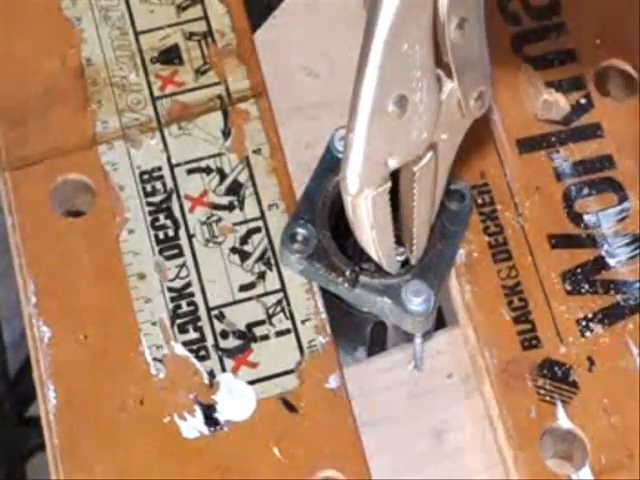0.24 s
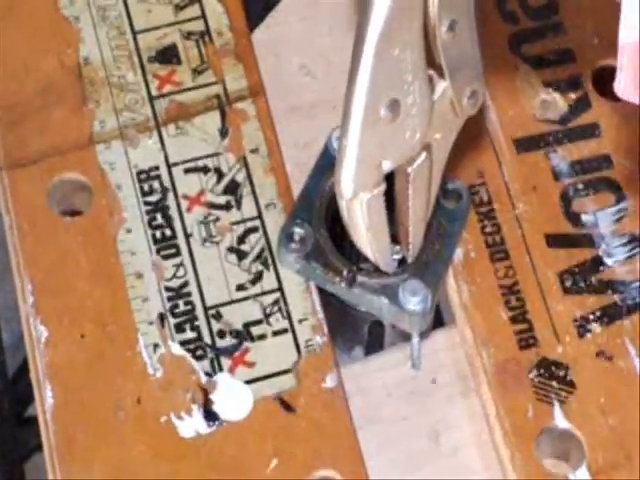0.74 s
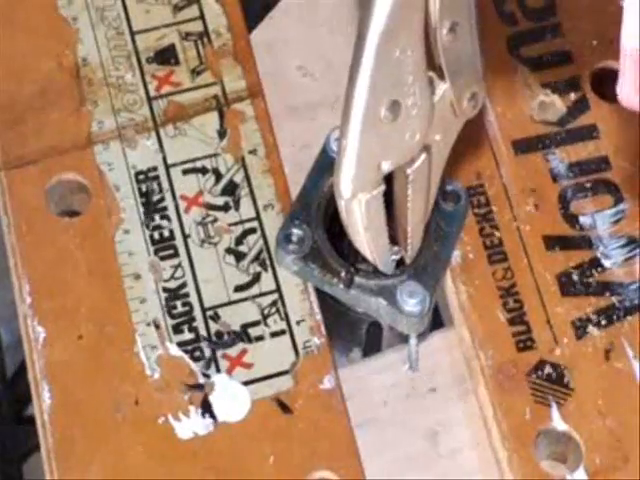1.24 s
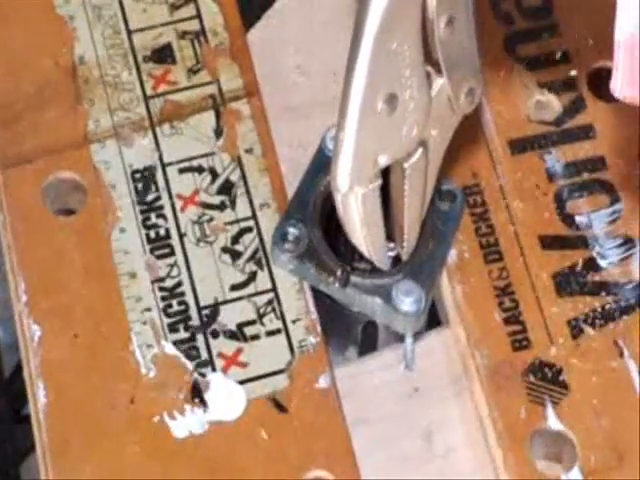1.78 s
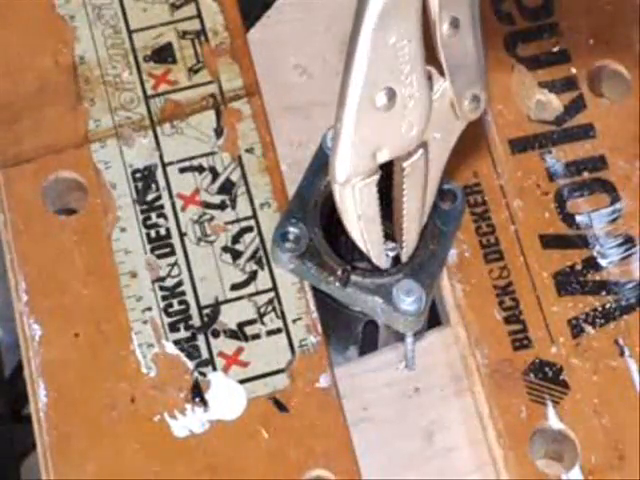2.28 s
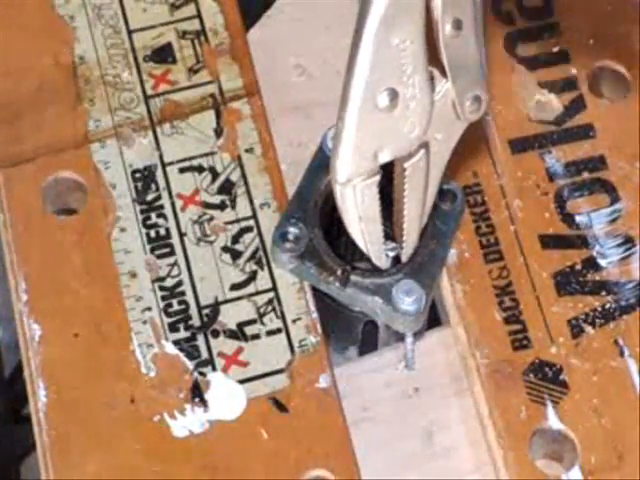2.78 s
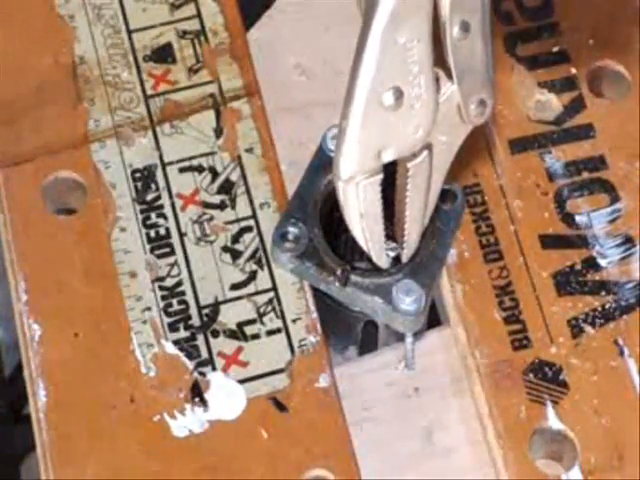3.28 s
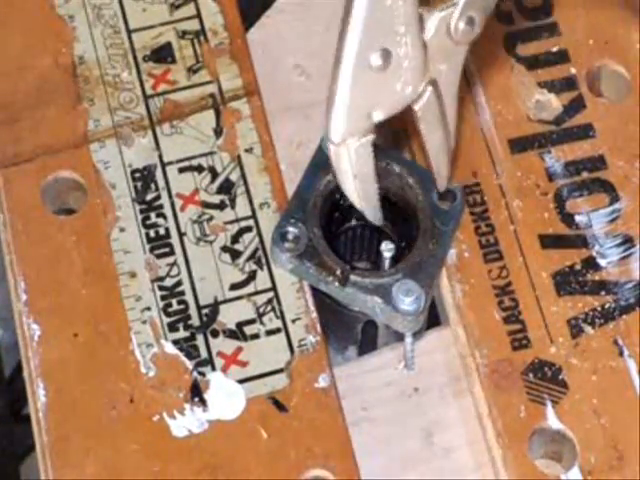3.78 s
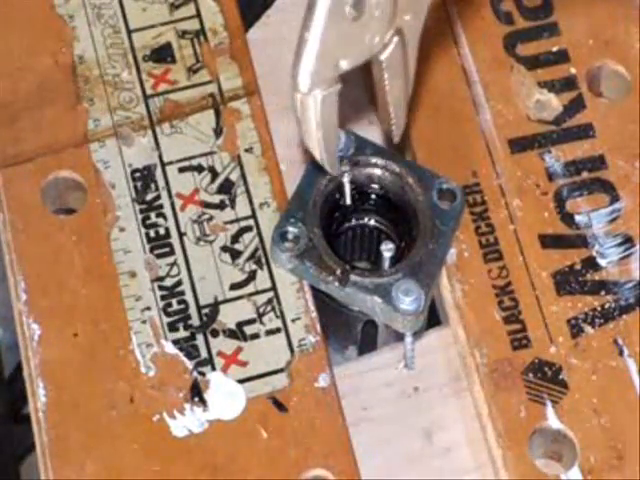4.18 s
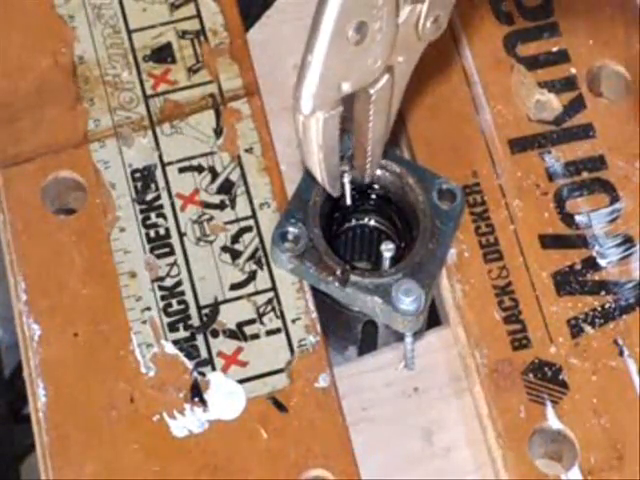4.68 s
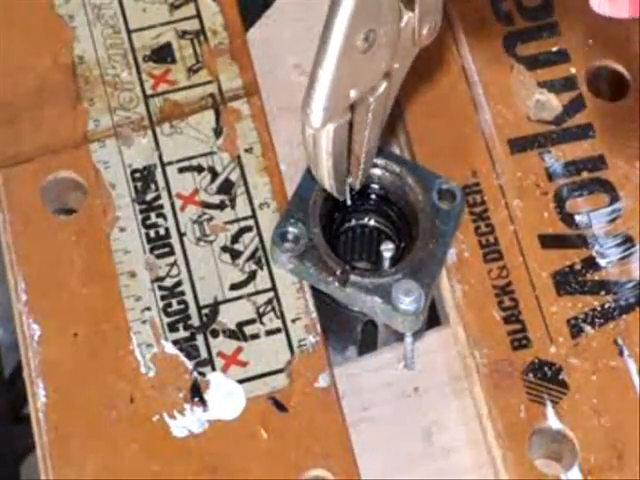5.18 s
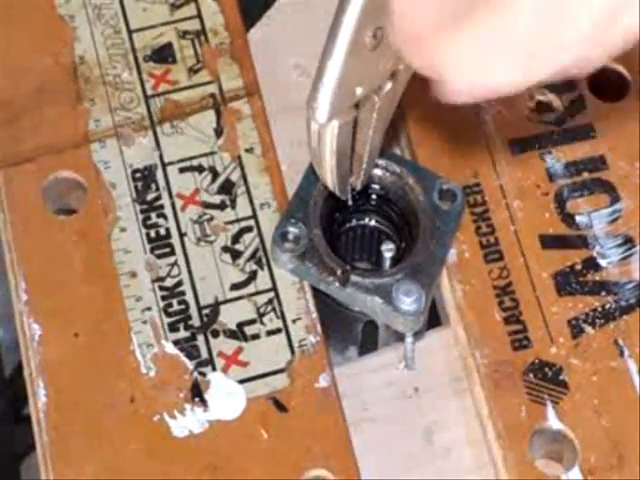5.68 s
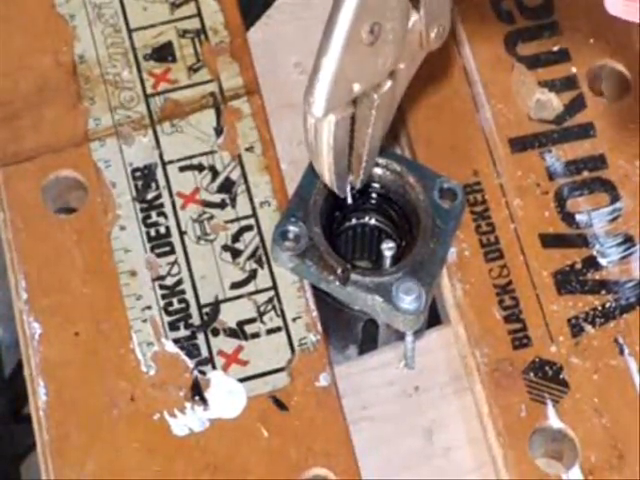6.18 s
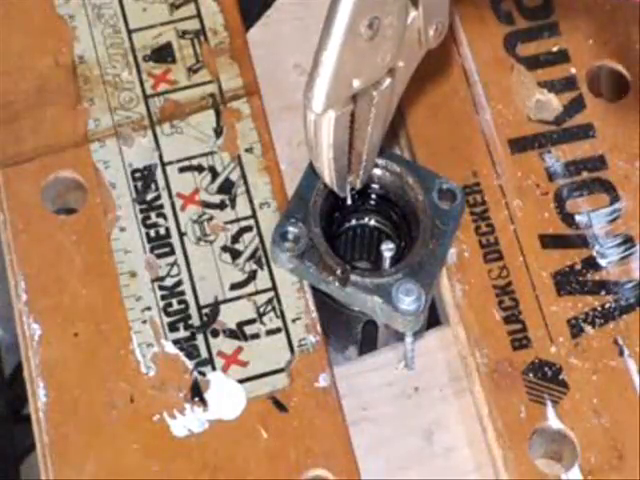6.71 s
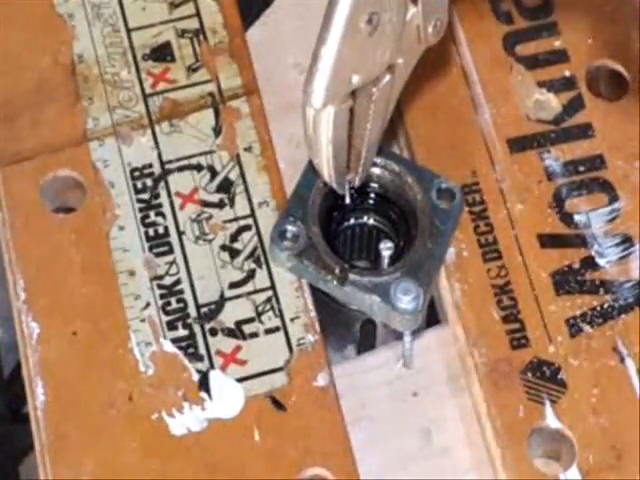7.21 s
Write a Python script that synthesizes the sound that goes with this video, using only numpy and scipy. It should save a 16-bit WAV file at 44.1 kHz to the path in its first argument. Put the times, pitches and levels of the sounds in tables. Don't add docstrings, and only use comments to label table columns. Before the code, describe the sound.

Three hard metallic slide-hammer clacks ring out in a small garage, then quiet plier knocks and tiny ticks, then two softer clacks near the end.

```python
import sys
import numpy as np
from scipy import signal
from scipy.fft import rfft, irfft, next_fast_len
from scipy.io import wavfile
from scipy.ndimage import map_coordinates

SR = 44100
rng = np.random.default_rng(int(sys.argv[2]) if len(sys.argv) > 2 else 0)


def output_pcm(signal):
    pcm = np.clip(np.atleast_2d(signal).T, -1, 1) * 32767
    wavfile.write(sys.argv[1], SR, np.round(pcm).astype(np.int16))


def boost_factor(decibels):
    exponent = np.asarray(decibels, float) / 20
    return 10 ** exponent


N = 328545

# (frequency [Hz], level [dB], t60 [s])
STEEL_MODES = [(886.5, -13.5, 0.088), (1858.9, -10, 0.03), (2554.2, -8, .06), (2700, -7, 0.092),
               (2886.1, -8, 0.12), (3560, -11, 0.025), (4406, -9, 0.068), (4660, -10.5, 0.052),
               (5202, -12, 0.091), (5727, -4, 0.093), (6880, -9.5, .05), (7770, -13, .06),
               (9102, -10.5, 0.022), (9688.1, -9, 0.049), (10259, -11.5, 0.045), (10744, -11, .05)]


def hammer():
    # (time [s], peak [dB], extra thud [dB], extra middle [dB], freedom of the rod [dB])
    blows = [
        (.6950, -9, 3.5, 4.5, 0.2521),
        (1.2174, -8, 0.22, 0.155, -1.3104),
        (1.7210, -6, 2.5, -4.5, -6),
        (6.8937, -12.5, -0.8659, -0.02, -4),
        (7.4444, -13, -2, -6, -4),
    ]
    # (frequency [Hz], level [dB per Hz])
    clack = [(40, -26.5), (100, -10.5), (170, 2), (250, -4.5), (600, 0), (900, -3), (1300, -10),
             (2800, -6.5), (3500, -12.5), (5500, -8), (10500, -5), (12000, -7.5)]
    # (frequency [Hz], level [dB], t60 [s])
    rod_modes = [(573.2, -49.5, 0.71), (1158.5, -56, .6), (1770, -54, .5), (2468.3, -51.5, .5),
                 (2725, -55.5, .6), (3500, -56.5, 0.48), (4200, -58, 0.56), (5574, -54.5, .5),
                 (6190, -57, 0.84), (8830, -62, 0.68), (9000, -61.5, 1.1), (9900, -58, 0.76),
                 (10085, -63, 1.4), (10460, -61.5, 0.61024), (10792, -62, .5)]
    # (frequency [Hz], level under the blow [dB], t60 [s], share of the freedom)
    long_modes = [(722.48, -56.5, 2.8, -.1), (2121, -50.5, 2.2, .9), (5775, -63, 2.5, .3)]
    held_db = 6
    out, t = np.zeros((2, N)), np.arange(SR // 2) / SR
    for s, db, thud_db, middle_db, free_db in blows:
        blow = contact(thud_db - 17.5, middle_db - 16, top_db=-5.5, t60=.055, spectrum=clack, steel_db=-13.5,
                       room_db=-11.5, crack_db=-5, rise=.002, size=24576)
        add(out, s - .0014, boost_factor(db + 2.5) * blow)
        rod = sum(ringing([mode], t, scatter_db=1.5) * wobble(40, size=len(t)) for mode in rod_modes)
        add(out, s, boost_factor(db - 0.5) * ports(rod * np.clip(4 - 8 * t, 0, 1)))
        for hz, under_db, t60, share in long_modes:
            freedom_db = share * free_db
            add(out, s, lasting(s, hz, db + under_db + freedom_db, t60 * 2 ** (freedom_db / held_db)))
    return out


def rebounds():
    # (time [s], peak [dB], bench thud [dB], middle [dB], top [dB])
    bounces = [
        (.772, -39, -14, -8, -9),
        (1.2889, -34, -12, -6, 2.5),
        (1.3958, -46, -25, -13.5, -15),
        (1.4187, -41.5, -17.5, -11.5, -9),
        (1.8217, -31, -16, -15.5, -10.5),
        (6.9694, -37, -16, -8, -11),
        (7.061, -48, -19.5, -17, -20),
        (7.0938, -42.5, -19.5, -13, -16.5),
    ]
    return light_contacts(bounces)


def slide():
    # (start [s], stop [s], level at
    # the stop [dB])
    strokes = [
        (0.449, 0.591, -76),
        (0.626, 0.702, -58.5),
        (0.932, 1.065, -69.5),
        (1.124, 1.215, -66.5),
        (1.634, 1.719, -59.5),
        (6.242, 6.253, -46),
        (6.831, 6.881, -62.5),
        (7.375, 7.44, -63),
    ]
    # (frequency [Hz], width [Hz], level [dB])
    resonances = [(600.95, 300, -9), (1847.7, 90, 0.5), (2139.7, 120, -0.5), (2800, 200, -2),
                  (3500, 69, -3), (5741.1, 160, -3), (6734, 200, -10)]
    t, grit = np.arange(N) / SR, np.zeros(N)
    for start, stop, db in strokes:
        speed = np.clip((t - start) / (stop - start), 0, 1) ** .9
        grit += boost_factor(db) * speed * np.clip((stop + 0.013 - t) / 0.0091, 0, 1)
    rough = rng.standard_normal(N) * boost_factor(2.1 * wobble(90, size=N))

    def rod(hz):
        total = 0
        for k, (centre, width, db) in enumerate(resonances):
            damping = 1j * hz * width
            total = total + (-1) ** k * boost_factor(db) * damping / (centre * centre - hz * hz + damping)
        return total

    resonant = boost_factor(15) * filtered(grit * unit(rough), rod)
    dull = 0.79 * filtered(grit * rough, lambda hz: 1 / (1 + (hz / 4000) ** 2))
    return ports(resonant + dull)


def knocks():
    return light_contacts([(0.1905, -39, -11, -3, 5), (2.1922, -55, -17, -8.5, -27),
                           (2.259, -61, -6, -6, -24), (2.3269, -39.5, -31, -12, -16),
                           (2.343, -42, -23, -5, -17), (2.362, -45, -25, -7, -17),
                           (3.529, -38.5, -26, -20.5, -14), (3.5438, -37.5, -38, -24, -8),
                           (3.615, -55.5, -20.5, -15, -19), (3.64, -62, -12, -5.5, -21.5),
                           (3.7269, -60.5, -16, -1.5, -2.5), (3.8816, -65, -9.5, -7, -8),
                           (4.5724, -65, -8, -4, -9), (4.6689, -73, 11, 1.5, -8), (4.7786, -76, 9, -3, -8),
                           (4.9181, -67, -5.5, -1.2, -12), (4.9418, -56, -8, -9, -15.5),
                           (4.9974, -72, -4, 6, -11.5), (5.463, -29, -18, -17.5, -.6),
                           (6.1162, -67, -15.5, -19, -5.5), (6.2506, -37, -8, -4, -15.5),
                           (6.4189, -47.5, -10.5, -7, -12.5), (6.536, -46, -21, -8, -24),
                           (7.3051, -57, -22, -8, -15)])


def pliers_ringing():
    # (time [s], frequency [Hz], level [dB], t60 [s])
    rings = [(.191, 739.4, -75.5, 1.594), (.191, 1339, -50, 0.215), (.191, 1901, -52, 0.198),
             (.191, 2476, -63.5, 0.4115), (1.291, 6190, -57, 0.567), (1.418, 5560, -53, .11),
             (2.195, 4190, -69, .07), (2.328, 6205, -60.5, .75), (3.544, 5560, -51, .2),
             (3.545, 2600, -56, .13), (3.545, 7987, -58, .09), (3.64, 850, -67, .18),
             (3.742, 1307, -62, .14), (4.944, 3090, -67, .08), (5.464, 5612, -45, .15),
             (5.464, 2461, -57, 0.7378), (5.464, 1766, -56, 0.4414), (5.65, 739, -73.5, 0.2891),
             (6.252, 2300, -69, .5), (6.252, 1996, -53, .12), (6.252, 5862, -61, .07),
             (6.419, 2006, -59, .09), (6.419, 4500, -65, .13), (6.537, 1770, -66, 0.293),
             (6.537, 2100, -59, .08), (6.537, 5180, -62, 0.0723), (7.094, 2800, -52, .1),
             (7.094, 5575, -59, .1), (7.305, 3450, -62, 0.079), (7.305, 5600, -64, .08)]
    out = np.zeros((2, N))
    for s, hz, db, t60 in rings:
        add(out, s, lasting(s, hz, db, t60))
    return out


def jaw_ticks():
    # (time [s], peak [dB])
    ticks = [(2.8396, -62.5), (2.9895, -58.5), (3.0196, -58), (3.0394, -70.5), (3.1149, -60),
             (3.1405, -69.5), (3.1902, -65), (3.3284, -64), (3.339, -70.5), (3.7001, -65), (3.7792, -70),
             (3.8824, -53), (3.9243, -64), (3.939, -66.5), (4.5723, -62.5), (4.9424, -65.5),
             (5.8893, -68.5), (5.9695, -68), (6.1172, -56)]
    out, t = np.zeros((2, N)), np.arange(SR // 20) / SR
    for s, db in ticks:
        tick = boost_factor(db + 6.5 - 60 * t / 0.010947) * rng.standard_normal(len(t))
        add(out, s, ports(filtered(tick, lambda hz: 1 / (1 + (6000 / (hz + 1)) ** 4))))
    return out


def light_contacts(events):
    # (frequency [Hz], level [dB per Hz])
    tap = [(50, -34), (150, -3.5), (450, 4), (1200, -8.5), (2600, -7.5), (5000, -10), (11500, -9.5)]
    out = np.zeros((2, N))
    for s, db, thud_db, middle_db, top_db in events:
        chatter_s = .055 - .0001 * max(top_db, -18)
        knock = contact(thud_db, middle_db, top_db, chatter_s, tap, steel_db=-19, room_db=-8.5, crack_db=-9,
                        rise=.003, size=10240)
        add(out, s - .0018, boost_factor(db + 2.0) * knock)
    return out


def contact(thud_db, middle_db, top_db, t60, spectrum, steel_db, room_db, crack_db, rise, size):
    # (frequency [Hz], level [dB], t60 [s])
    bench_modes = [(152.04, -6.5, 0.14), (179.86, 2.5, 0.085), (199.64, 0.5, 0.11), (290.6, -1, .1),
                   (317.72, -0.5, .12), (642, -6, .1)]
    t = np.arange(SR // 5) / SR
    rise = rise + .0001 * max(-top_db - 6, 0)
    swell = np.clip(t / rise, 0, 1) ** 4.5
    crack = boost_factor(crack_db - 60 * np.abs(t - rise) / .005)
    chatter = 0.67 * swell * boost_factor(-60 * t / max(t60, .004))
    uneven = boost_factor(4.2 * wobble(400, size=len(t)))
    pushes = (crack + chatter * uneven) * rng.standard_normal(len(t))
    pushes *= 1.3 * np.linalg.norm(crack + chatter) / np.linalg.norm(pushes)

    tilt = [(300, thud_db - 3.0), (1100, middle_db + 8.0), (3500, 0.0032), (8000, top_db), (11000, 0.93 * top_db)]
    colour = lambda hz: boost_factor(along(spectrum, hz) + 11.5 + along(tilt, hz))
    first = pushes[:400]
    steel = signal.fftconvolve(ringing(STEEL_MODES, t, scatter_db=3.5), first)[:len(t)]
    steel = filtered(steel / np.linalg.norm(first), lambda hz: boost_factor(steel_db + along(tilt, hz)))
    bench = boost_factor(thud_db - 4) * np.clip(t / 0.0028, 0, 1) * ringing(bench_modes, t, scatter_db=3.5)

    room = filtered(garage(size), lambda hz: colour(hz) * metallic(hz, lift_db=3.0, width_hz=29))
    out = boost_factor(room_db) * room * boost_factor(1.5264 * wobble(70, size=size))
    add(out, 0, ports(filtered(pushes, colour) + steel + bench))
    return out


def metallic(hz, lift_db, width_hz):
    centre, db, _ = np.transpose(STEEL_MODES)[:, :, None]
    gain = boost_factor(lift_db + db + 3.5 * rng.standard_normal(db.shape))
    return 0.93 + (gain / (1 + ((hz - centre) / width_hz) ** 2)).sum(axis=0)


def lasting(s, hz, db, t60):
    grip_s = 2.5771
    t = np.arange(int(SR * min(t60, 1.2))) / SR
    waver_db = 2.4 * wobble(8, size=len(t))
    rough_db = .3 / t60 ** 0.7 * wobble(150, size=len(t))
    fade = np.clip(t / .004, 0, 1) * np.clip(3 - 2.5 * t, 0, 1)
    if s < grip_s and hz > 1000:
        fade *= np.clip((grip_s - s - t) / 0.11, 0, 1)
    return ports(boost_factor(waver_db + rough_db) * fade * ringing([(hz, db, t60)], t, scatter_db=0))


def ringing(modes, t, scatter_db):
    hz, db, t60 = np.transpose(modes)[:, :, None]
    gain = boost_factor(db + scatter_db * rng.standard_normal(hz.shape) - 60 * t / t60)
    return (gain * np.sin(2 * np.pi * hz * t)).sum(axis=0) * (1 - np.exp(-t / 0.00048))


def ports(x):
    # (frequency [Hz], left-right [dB])
    lean = [(100, -0.786), (1000, -0.091), (3500, 1.4417), (6000, 2.5), (9000, 5.5), (11500, 8.5),
            (13000, 12)]
    # (frequency [Hz], left leads by [rad])
    lead = [(300, .02), (1300, .12), (4600, 0.2), (7300, 0.74), (9000, 0.4), (11000, 0.33)]
    half = lambda hz: boost_factor(along(lean, hz) / 2) * np.exp(.5j * along(lead, hz))
    return filtered(x, lambda hz: np.array([half(hz), 1 / half(hz)]))


def garage(size):
    # (frequency [Hz], t60 [s])
    decay = [(100, .3), (260, 0.48), (700, 0.26), (1840, 0.22), (4850, .19), (11000, 0.11)]
    # (frequency [Hz], left-right likeness)
    echo_alike = [(100, 1), (1000, .9), (4000, 0.43), (11000, 0.59)]
    linger_db, linger_times = -25.5, 3.9
    hz, t, z = signal.stft(rng.standard_normal((2, size)), SR, nperseg=256)
    fall_db = -60 * t / along(decay, hz)[:, None]
    fall = boost_factor(fall_db) + boost_factor(linger_db + fall_db / linger_times)
    fade = np.clip(4 - 4 * t / t[-1], 0, 1)
    tail = signal.istft(z * fall * fade, SR, nperseg=256)[1][:, :size]
    return paired(tail * np.clip(np.arange(size) / SR / 0.0047, 0, 1), echo_alike)


def paired(two, alike):
    turn = lambda hz: np.arccos(np.clip(along(alike, hz), -1, 1)) / 2
    mid, side = filtered(two, lambda hz: np.array([np.cos(turn(hz)), np.sin(turn(hz))]))
    return np.array([mid + side, mid - side])


def wobble(rate, size):
    knots = rng.standard_normal(size // 50 + 4)
    return map_coordinates(knots, [np.arange(size) * rate / SR])


def unit(x):
    return x / np.sqrt(np.mean(x ** 2) + 1e-20)


def along(points, hz):
    f, v = np.transpose(points)
    return np.interp(np.log(hz + 1), np.log(f + 1), v)


def filtered(x, response):
    m = next_fast_len(x.shape[-1] + 2048)
    return irfft(rfft(x, m) * response(np.fft.rfftfreq(m, 1 / SR)), m)[..., :x.shape[-1]]


def add(track, s, sound):
    start = round(s * SR)
    part = track[..., start:start + sound.shape[-1]]
    part += sound[..., :part.shape[-1]]


def bench_sway():
    ends_s, settle_s = 1.8, 0.58
    return 5 * np.clip((ends_s - np.arange(N) / SR) / settle_s + 1, 0, 1)


def rumble(sway_db):
    # (frequency [Hz], level [dB per Hz])
    tone = [(12, -6.5), (30, 1.5), (60, -5), (120, -11.5), (250, -20.5), (600, -36), (2000, -70)]
    low = filtered(rng.standard_normal((2, N)), lambda hz: boost_factor(along(tone, hz)))
    level_db = -71 + sway_db + 3 + 1.8 * wobble(7, size=N)
    return boost_factor(level_db) * unit(paired(low, [(30, 0.91), (200, 0.28)]))


def hiss(sway_db):
    # (frequency [Hz], level [dB per Hz])
    tone = [(20, -15.5), (100, -16.5), (300, -22), (700, -26.5), (1500, -29), (4000, -33), (11400, -35.5)]
    # (frequency [Hz], left-right likeness)
    hiss_alike = [(60, 0.3), (170, 0.23), (490, 0.23), (1420, 0.02), (4080, 0.05), (11700, 0.098)]
    white = filtered(rng.standard_normal((2, N)), lambda hz: boost_factor(along(tone, hz)))
    return boost_factor(-74.5 + 4.8 + .3 * sway_db) * unit(paired(white, hiss_alike))


def scene():
    sway_db = bench_sway()
    tool = hammer() + rebounds() + slide()
    pliers = knocks() + pliers_ringing() + jaw_ticks()
    return tool + pliers + rumble(sway_db) + hiss(sway_db)


def band_limit(x):
    return signal.sosfilt(signal.butter(12, 12320, fs=SR, output="sos"), x)


def record(dry):
    top_hz = 11191
    soft = dry / (1 + np.abs(dry / .8) ** 4) ** (1 / 4)
    edge = lambda hz: (1 + np.tanh((hz - top_hz) / 70)) / 2
    band = filtered(soft, lambda hz: boost_factor(edge(hz) * (-27.5 - (hz - top_hz) / 130)))
    return band_limit(band)


dry = scene()
out = record(dry)
output_pcm(out)
```